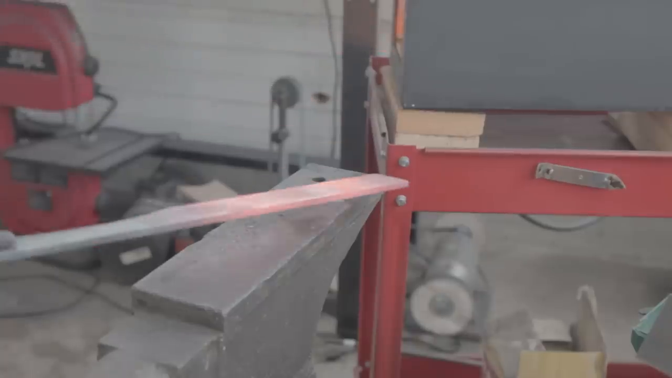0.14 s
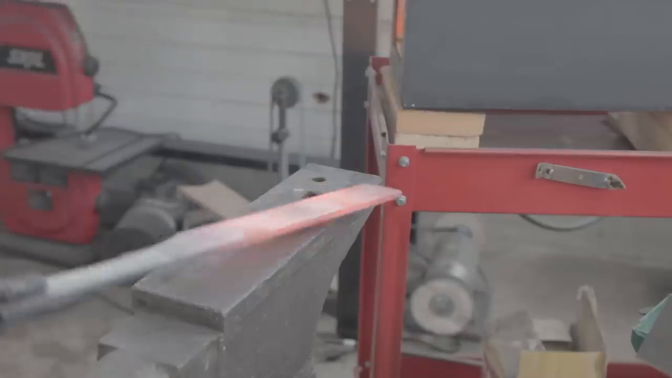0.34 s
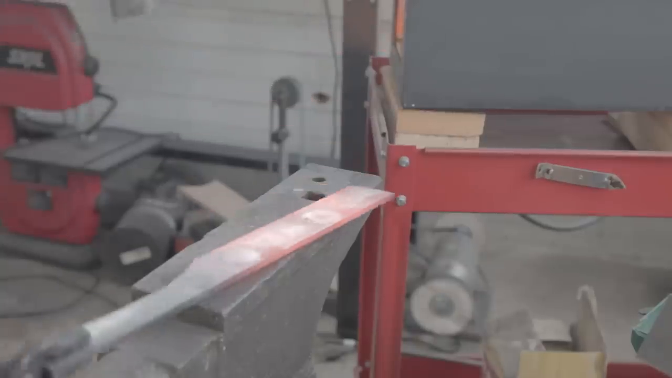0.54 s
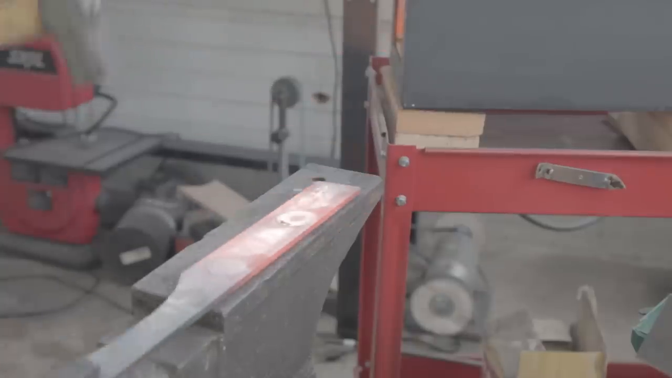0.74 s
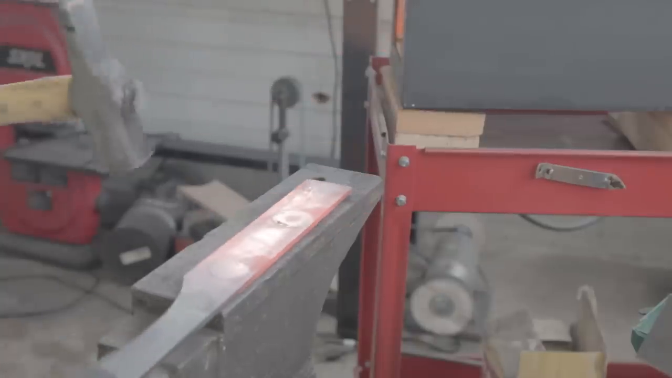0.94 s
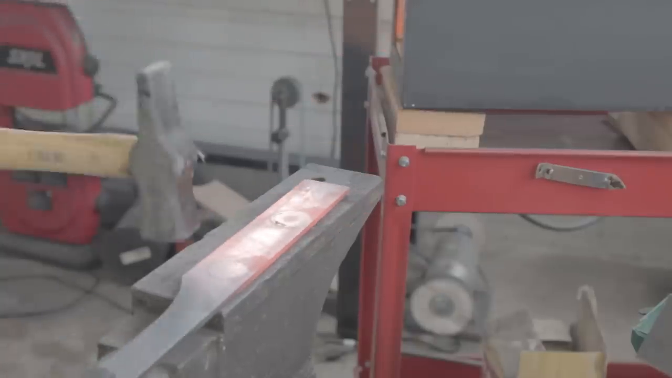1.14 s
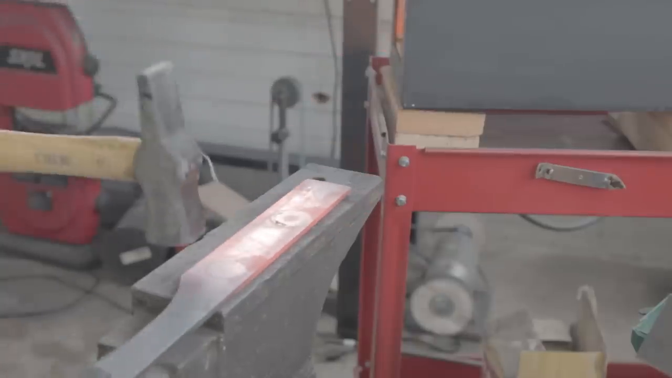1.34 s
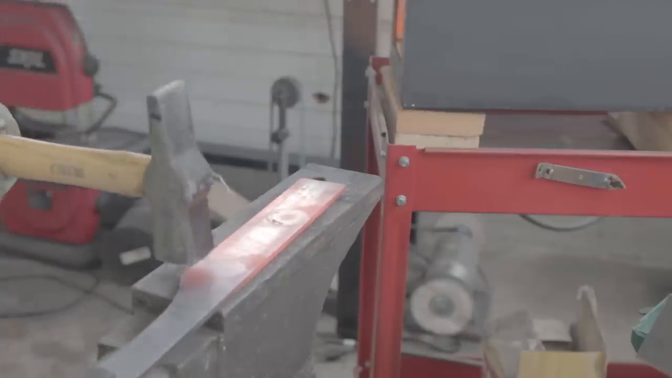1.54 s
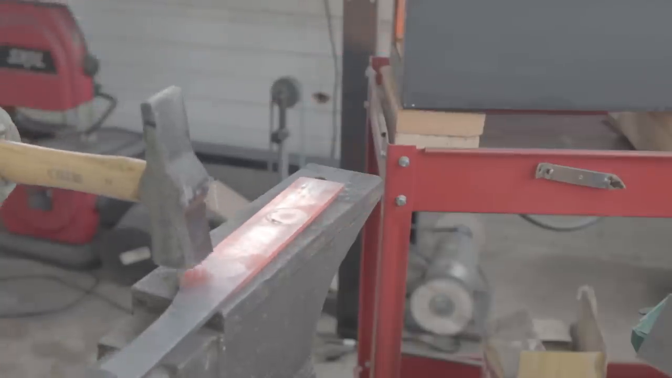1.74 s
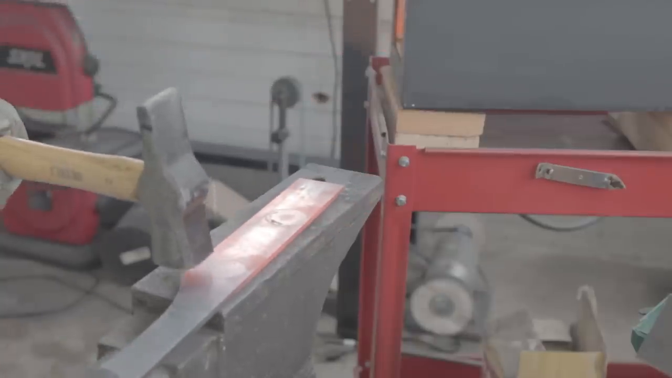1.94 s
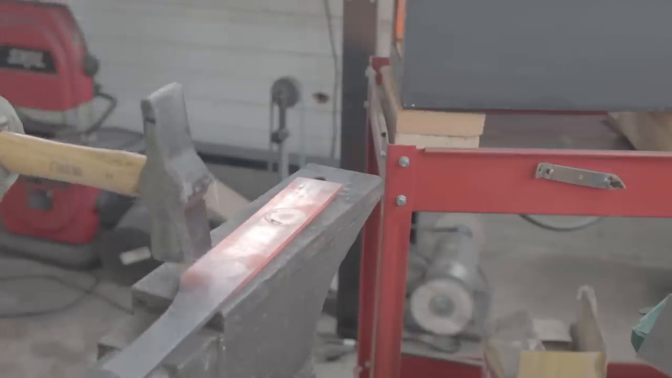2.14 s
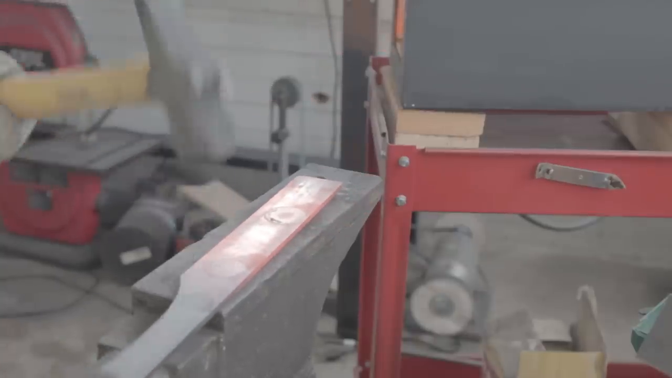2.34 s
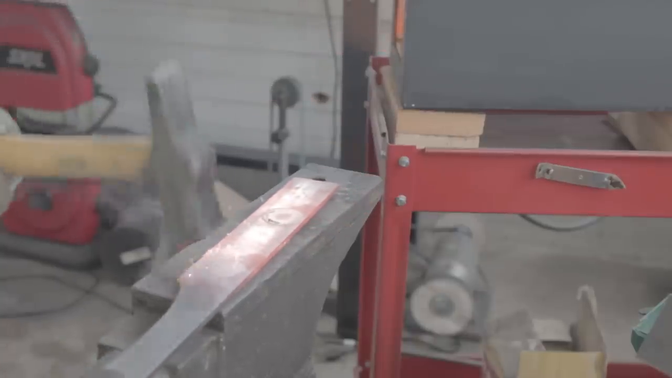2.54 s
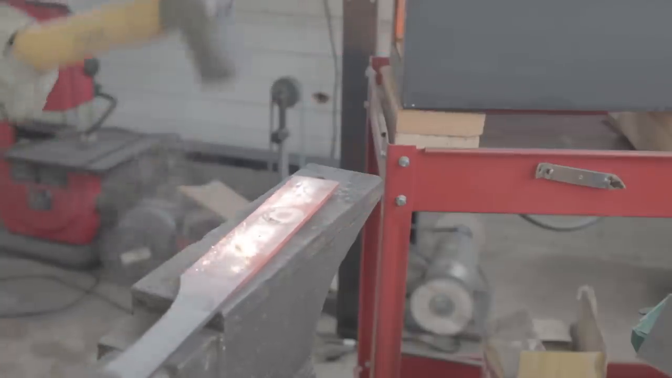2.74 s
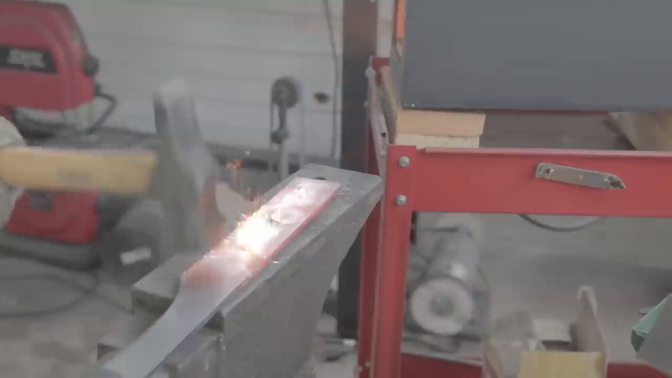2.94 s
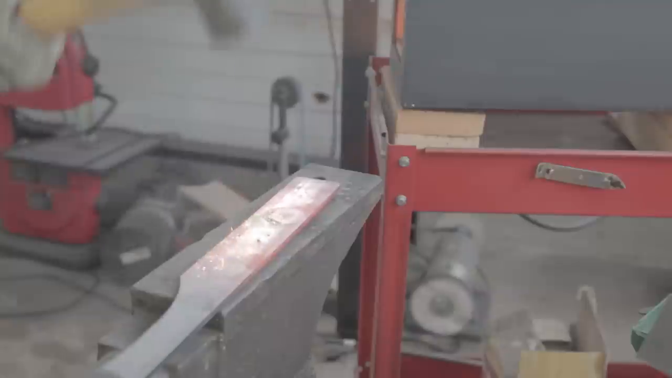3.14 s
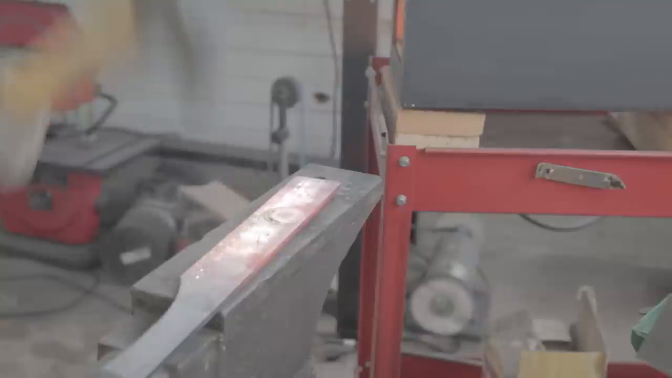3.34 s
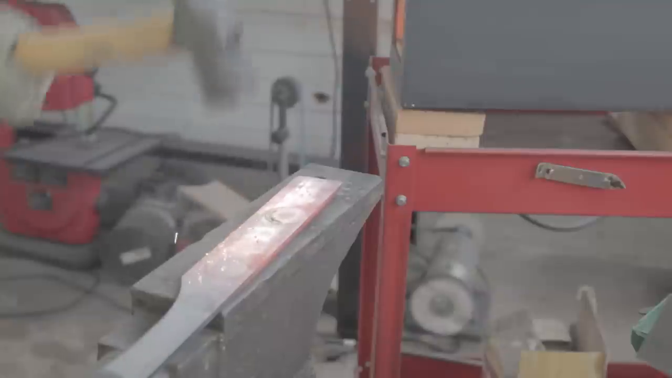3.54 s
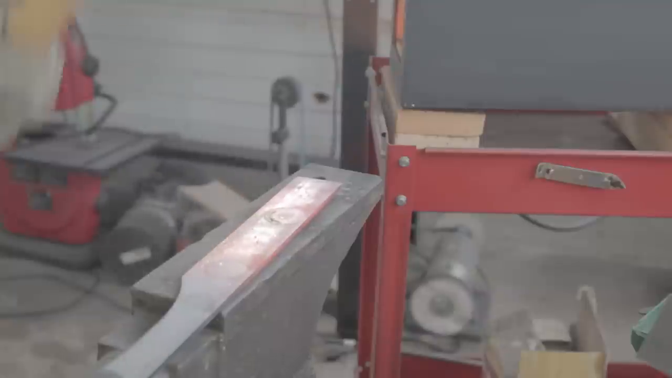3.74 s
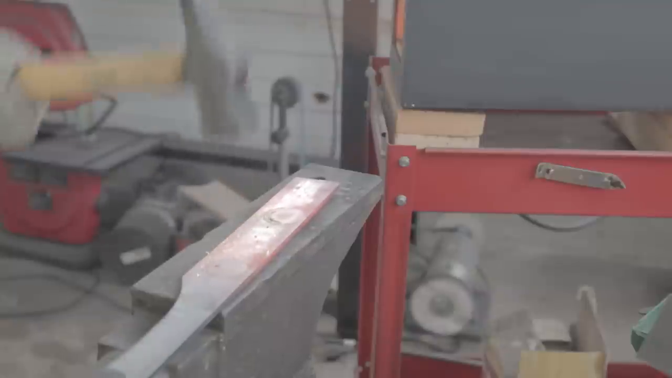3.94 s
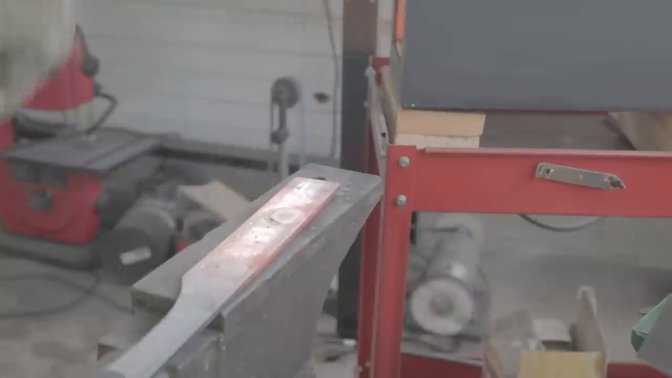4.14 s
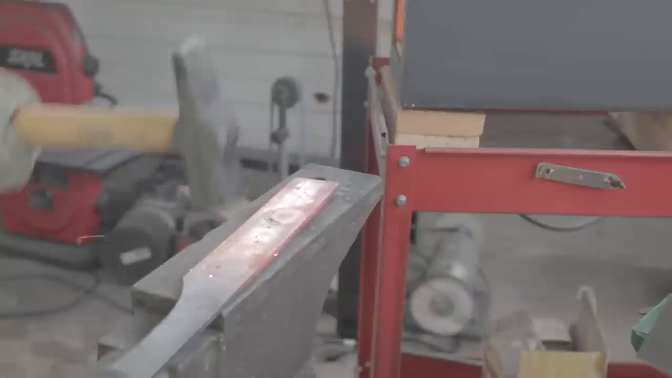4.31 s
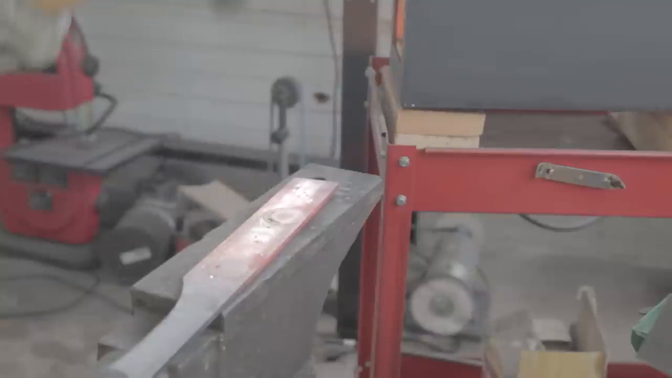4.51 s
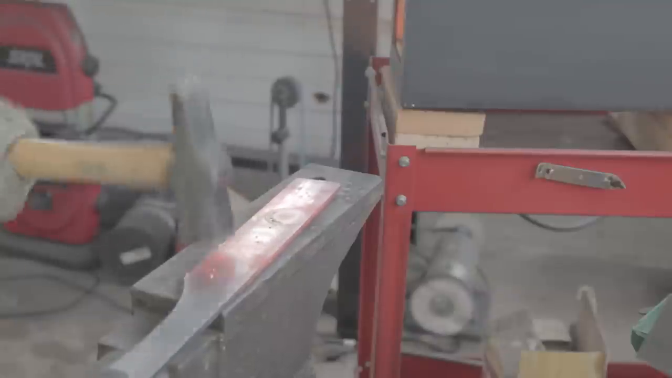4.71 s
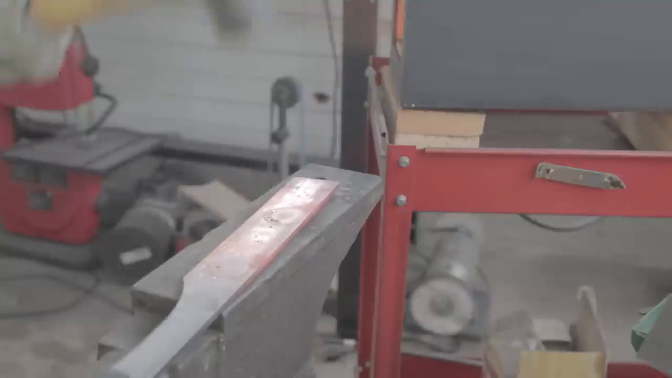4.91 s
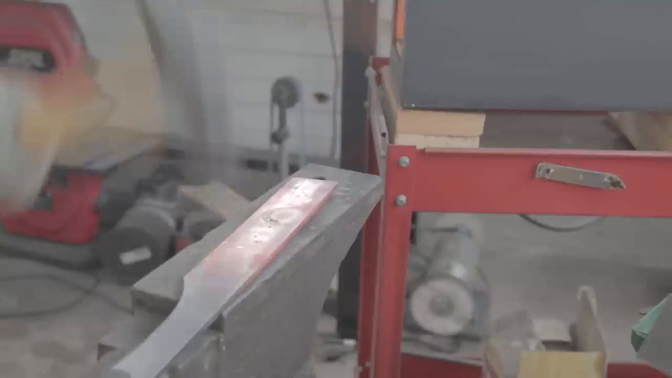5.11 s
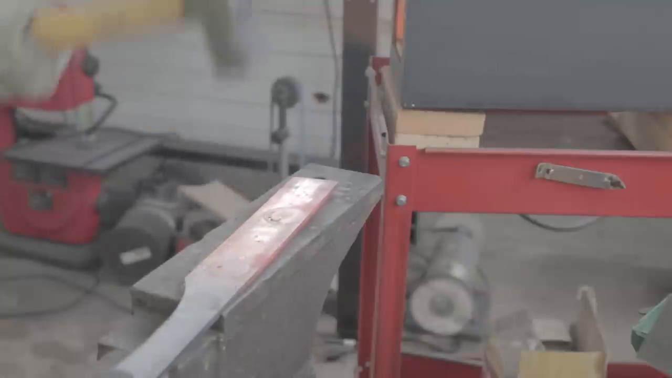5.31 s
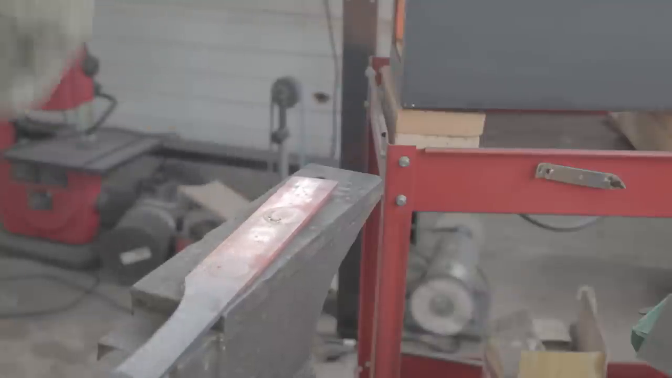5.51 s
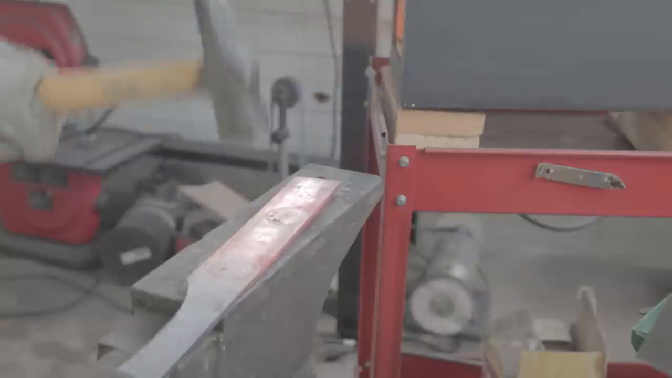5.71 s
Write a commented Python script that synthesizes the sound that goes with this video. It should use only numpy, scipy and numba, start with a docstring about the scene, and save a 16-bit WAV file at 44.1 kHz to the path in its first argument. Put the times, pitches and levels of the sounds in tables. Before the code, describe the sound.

A constant bassy burner rush with slight flutter fills the first seconds, with two quiet gritty scrapes of metal. From about two and a half seconds a hammer hits steel on an anvil eight times, evenly, each a hard crack with bright, shimmering ring and short room reverberation. Peaks clip; the forge sounds quieter between hits.

```python
"""A hammer strikes a hot blade on an anvil eight times, over the roar of a gas forge in a workshop.
Each blow layers a noise crack, its reverberation, a buzz of chatter and a bank of beating steel modes.
Before them the blade slides onto the anvil in two pushes of rough noise; the forge is resonant noise.
Gain control at the microphone pushes the roar down after loud sound and lets it creep back; peaks clip."""
import sys
import numpy as np
from scipy import signal
from scipy.fft import rfft, irfft, next_fast_len
from scipy.io import wavfile
from scipy.ndimage import uniform_filter1d, minimum_filter1d, map_coordinates
from numba import njit

SR = 44100
rng = np.random.default_rng(int(sys.argv[2]) if len(sys.argv) > 2 else 0)


def output_pcm(signal):
    """Save a mono or channel-first signal as 16-bit PCM at the path in sys.argv[1].

    Samples are clipped to [-1, 1] before scaling.
    """
    pcm = np.clip(np.atleast_2d(signal).T, -1, 1) * 32767
    wavfile.write(sys.argv[1], SR, np.round(pcm).astype(np.int16))


N = 258867


def amp(db):
    """Decibels to gain."""
    return 10 ** (np.asarray(db) / 20)


def unit(x):
    """Scale to rms 1."""
    return x / np.sqrt(np.mean(x ** 2) + 1e-20)


def along(points, hz):
    """Read a curve of (Hz, value) points on a log frequency axis."""
    f, v = np.transpose(points)
    return np.interp(np.log(hz + 1), np.log(f + 1), v)


def wobble(rate, size):
    """A smooth random curve with the given number of knots a second."""
    knots = rng.standard_normal(int(size * rate / SR) + 4)
    return map_coordinates(knots, [np.arange(size) * rate / SR])


def noise(colour, size):
    """Noise of rms 1 whose spectrum in dB is a function of frequency."""
    m = next_fast_len(size + 8192)
    spectrum = rfft(rng.standard_normal(m)) * amp(colour(np.fft.rfftfreq(m, 1 / SR)))
    return unit(irfft(spectrum, m)[:size])


def high_pass(x, cut_hz):
    """Roll off the bass with a gentle second-order slope."""
    return signal.sosfilt(signal.butter(2, cut_hz, "high", fs=SR, output="sos"), x)


# Broad colour of the burner noise. Each row: frequency in Hz, relative level in dB.
BURNER_COLOUR = [(20, -34), (40, -29), (60, -14.5), (100, -12.5), (150, -9), (280, -3.5), (400, -3),
                 (550, -16.5), (780, -23.5), (1300, -25.5), (2000, -37.5), (4000, -41.5), (6000, -45.5),
                 (15800, -49)]
# Resonances of forge chamber, burner tube and gas jet. Each row: centre in Hz, width in Hz, lift in dB.
FORGE_RESONANCES = [(54, 11, -1), (123.4, 16, 8.5), (182, 18, 4.5), (238, 33, 8), (326.4, 11, 4),
                    (342, 33, 3.5), (1202, 42, 6.5), (1653, 67, 6.5), (2110, 80, 10.5), (2723, 38, 11.5),
                    (3510, 500, 7.5), (5030, 160, 5), (13350, 660, 9)]


def forge(level_db=-16.5, flutter_db=0.25, drift_db=1.2):
    """Turbulent burning is noise lifted at the forge resonances; the flame flutters and drifts a little."""
    def colour(hz):
        lift = sum(db / (1 + (2 * (hz - centre) / width) ** 2) for centre, width, db in FORGE_RESONANCES)
        return along(BURNER_COLOUR, hz) + lift

    flame_db = level_db + flutter_db * wobble(10, N) + drift_db * wobble(1.42, N)
    return noise(colour, N) * amp(flame_db)


# Colour of steel scraping on steel. Each row: frequency in Hz, relative level in dB.
SCRAPE_COLOUR = [(400, -18), (900, 5.5), (2200, 0.5), (4000, -1), (5500, -12), (8000, -19), (14000, -35)]
# Pushes of the blade over the anvil. Each row: start in seconds, length in seconds, level in dB.
BLADE_PUSHES = [(0.3, 0.05, -34.5), (0.609, 0.16, -31.5)]
PUSH_ATTACK_S, PUSH_RELEASE_DB_PER_S = 0.052, 124  # a push gathers speed, then dies away


def blade(grit_db=1.3):
    """Scaly steel catches and slips as it is pushed over the anvil face, so the scrape is gritty."""
    t = np.arange(N) / SR
    pushes = np.zeros(N)
    for start, length, db in BLADE_PUSHES:
        attack = np.clip((t - start) / PUSH_ATTACK_S, 0, 1)
        fade_db = PUSH_RELEASE_DB_PER_S * np.maximum(t - start - length, 0)
        pushes += attack * amp(db - fade_db)
    grit = unit(amp(grit_db * wobble(400, N)))
    return noise(lambda hz: along(SCRAPE_COLOUR, hz), N) * grit * pushes


# Colour of the impact, dry and off the walls. Each row: frequency in Hz, relative level in dB.
CRACK_COLOUR = [(40, -1.5), (200, 12), (600, -5.5), (1100, -3), (1800, 0), (2300, 1), (2900, -6),
                (3600, 1.5), (4300, -1.5), (4900, -14), (7500, -7.5), (10000, -10.5), (12000, -13.5),
                (15000, -7.5), (18000, -23)]


def crack_noise(size):
    """Broadband noise of hammer meeting steel, before it decays."""
    return noise(lambda hz: along(CRACK_COLOUR, hz), size)


# Decay of the workshop. Each row: frequency in Hz, time to fall 60 dB in seconds.
WORKSHOP_DECAY = [(100, 0.59), (600, 0.58), (2000, 0.66), (4000, 0.62), (8000, 0.25), (11000, 0.23),
                  (16000, 0.14)]


def reverberation(t, wall_db=-7.5, build=0.013):
    """The crack builds up off the walls, then decays band by band, the treble dying first."""
    hz, s, z = signal.stft(crack_noise(len(t)), SR, nperseg=256)
    decay = amp(-60 * s / along(WORKSHOP_DECAY, hz)[:, None])
    tail = signal.istft(z * decay, SR, nperseg=256)[1][:len(t)]
    return amp(wall_db) * tail * (1 - np.exp(-t / build))


# Colour of the blade's buzz. Each row: frequency in Hz, relative level in dB.
CHATTER_COLOUR = [(1000, -26), (2300, -3), (3000, -0.5), (4600, 0), (6200, -1.5), (9000, -9), (14000, -28)]


def chatter(t, t60=0.46):
    """A blade that does not lie flat buzzes against the anvil face: noise that dies away."""
    return noise(lambda hz: along(CHATTER_COLOUR, hz), len(t)) * amp(-60 * t / t60)


# Modes of the anvil with the blade on it; the low ones swell late, by way of the walls.
# Each row: frequency in Hz, relative level in dB, time to fall 60 dB in seconds, rise constant in seconds.
STEEL_MODES = [(1150, -19, .45, .02), (1560, -18, .45, .025), (1680, -18, .55, .025), (1741, -4.5, .5, .03),
               (2089, 0, .57, .03), (2524, -6, .66, .02), (2885, -20, .35, .002), (3341, -13, .55, .002),
               (3485, -1, .64, .001), (3792, -12.5, .55, .01), (4207, -5.5, .58, .001),
               (4582, -15, .48, .006), (5260, -25, .4, .002), (6466, -4, .45, .001), (7250, -18, .08, .001),
               (9165, -25, .33, .002), (9636, -22, .36, .002)]
# Reflections that make a mode beat. Each row: changes per second, share as a gain.
BEATING_ECHOES = [(75, .6), (220, .2)]
LOW_HZ, MIDDLE_HZ, UPPER_HZ, HIGH_HZ = 2300, 3485, 4207, 6466  # centres of the four groups of modes
LOW_RING_DB, UPPER_RING_DB = -3, -3  # base weights of these two groups
LOW_TRADE = .35  # dB the low modes gain per dB the middle ones lose, as the hammer lands elsewhere
PROMPT_DB, PROMPT_S = 9, .04  # extra ring just as the hammer leaves the steel, and its time constant
DETUNE_HZ = 5  # typical shift of a mode, as the blade loads the anvil differently at each blow


def ring(t, middle_db, high_db, ring_db=-11.3):
    """The place of the blow weights decaying modes; reflections make each one beat in size and phase."""
    out = np.zeros(len(t))
    direct = amp(PROMPT_DB * np.exp(-t / PROMPT_S))
    weights = [(LOW_HZ, LOW_RING_DB - LOW_TRADE * middle_db), (MIDDLE_HZ, middle_db),
               (UPPER_HZ, UPPER_RING_DB), (HIGH_HZ, high_db)]
    for hz, db, t60, rise in STEEL_MODES:
        echoes = sum(share * (wobble(rate, len(t)) + 1j * wobble(rate, len(t)))
                     for rate, share in BEATING_ECHOES)
        cycles = (hz + DETUNE_HZ * rng.standard_normal()) * t + rng.random()
        tone = np.real((direct + echoes) * np.exp(2j * np.pi * cycles))
        decay = amp(db + along(weights, hz) - 60 * t / t60)
        out += tone * decay * (1 - np.exp(-t / rise))
    return amp(ring_db) * out


def impact(t, crack_db=3, crack_t60=0.032, snap_db=13, snap_t60=0.004, bass_cut_hz=150):
    """A hard snap of contact, then a broadband crack; the small face radiates little bass."""
    burst = high_pass(crack_noise(len(t)), bass_cut_hz)
    snap = amp(snap_db - 60 * t / snap_t60)
    crack = amp(crack_db - 60 * t / crack_t60)
    return burst * (snap + crack)


# Hammer blows. Each row: start in seconds, force in dB, then the weights of the middle ring,
# the high ring and the blade chatter, all three in dB relative to the force.
HAMMER_BLOWS = [(2.5178, -2.5, 0.5, -4, -12.5), (2.9647, -0.5, -2.5, 0, -17.5),
                (3.3909, 2, -0.5, -1, -11.5), (3.8379, 3.5, 0.5, -6, -15), (4.277, 3, -4, -0.5, -21),
                (4.7213, 3, -4, 0, -35), (5.1621, 2.5, -8, 1.5, -19), (5.6168, 3, -9.5, -7, -10.5)]
CRACK_GROWTH = 0.56  # dB of crack per dB of force


def hammer():
    """The force of each blow drives its crack, the reverberation, the blade's chatter and the ring."""
    out = np.zeros(N + SR)  # spare second for the last tail
    t = np.arange(SR * 3 // 5) / SR
    for start, force_db, middle_db, high_db, chatter_db in HAMMER_BLOWS:
        tail = reverberation(t) + amp(chatter_db) * chatter(t) + ring(t, middle_db, high_db)
        blow = amp(CRACK_GROWTH * force_db) * impact(t) + amp(force_db) * tail
        out[round(start * SR):][:len(t)] += blow
    return out[:N]


def scene():
    """Forge, blade and hammer at one microphone."""
    return (forge() + blade() + hammer())[None]


@njit
def follow(excess, attack, recovery):
    """Gain reduction in dB: it climbs towards the excess level and creeps back at a steady rate."""
    cut, now = np.zeros(len(excess)), 0.0
    for i in range(len(excess)):
        if excess[i] > now:
            now = now + (excess[i] - now) * attack
        else:
            now = max(now - recovery, 0.0)
        cut[i] = now
    return cut


# quick stage, then slow stage
DUCK_SHARE, DUCK_ATTACK_S, DUCK_HOLD_S, DUCK_RELEASE_DB_PER_S = 0.48, 0.014, 0.17, 36
SETTLE_ATTACK_S, SETTLE_RELEASE_DB_PER_S = 0.15, 2


def gain_control(x, threshold_db=-13.5):
    """A quick stage ducks, holds and lets go; a slow stage creeps back; the deeper cut sets the gain."""
    level_db = 10 * np.log10(np.abs(uniform_filter1d(x ** 2, size=441)) + 1e-9)
    excess = np.maximum(level_db - threshold_db, 0)
    hold = int(DUCK_HOLD_S * SR)
    held = -minimum_filter1d(-excess, size=hold, origin=(hold - 1) // 2)  # highest excess of the hold time
    quick = follow(DUCK_SHARE * held, 1 / (DUCK_ATTACK_S * SR), DUCK_RELEASE_DB_PER_S / SR)
    slow = follow(excess, 1 / (SETTLE_ATTACK_S * SR), SETTLE_RELEASE_DB_PER_S / SR)
    return amp(-np.maximum(quick, slow))


CLIP_TOP, CLIP_HARDNESS = .43, 8  # where and how abruptly the microphone overloads


def record(dry, low_cut_hz=42, top_hz=16200):
    """Gain control ducks after loud sound, the peaks clip, and the treble ends steeply."""
    x = high_pass(dry, low_cut_hz)
    x = x * gain_control(x[0])
    x = x / (1 + np.abs(x / CLIP_TOP) ** CLIP_HARDNESS) ** (1 / CLIP_HARDNESS)
    return signal.sosfiltfilt(signal.butter(16, top_hz, fs=SR, output="sos"), x)


dry = scene()
out = record(dry)
output_pcm(out)
```